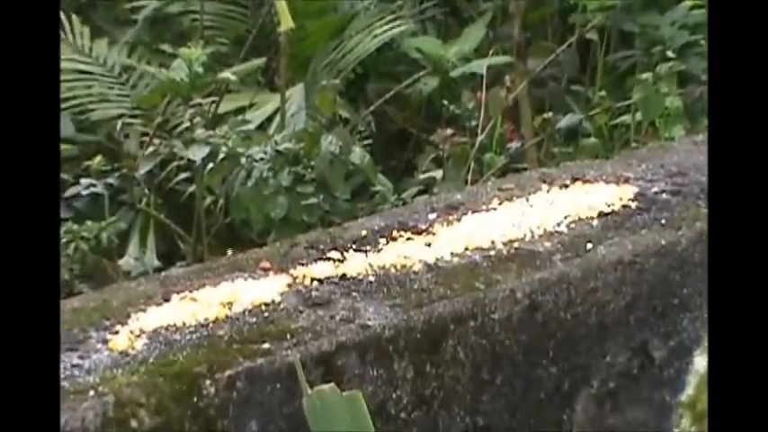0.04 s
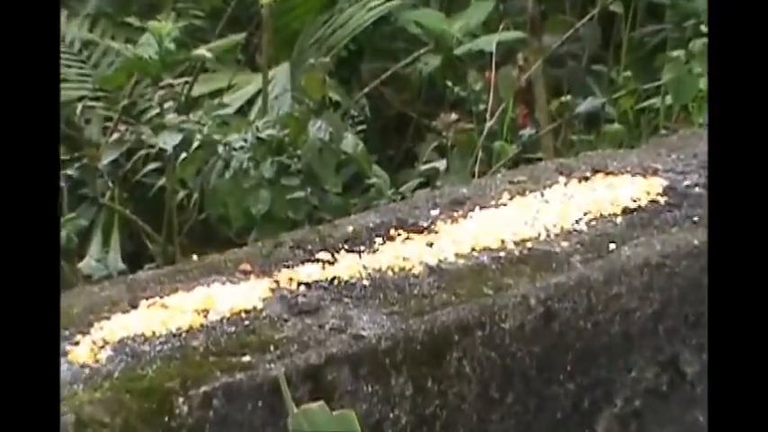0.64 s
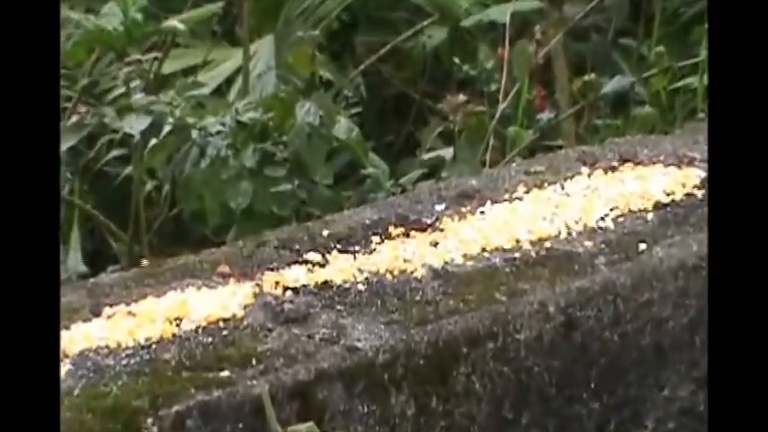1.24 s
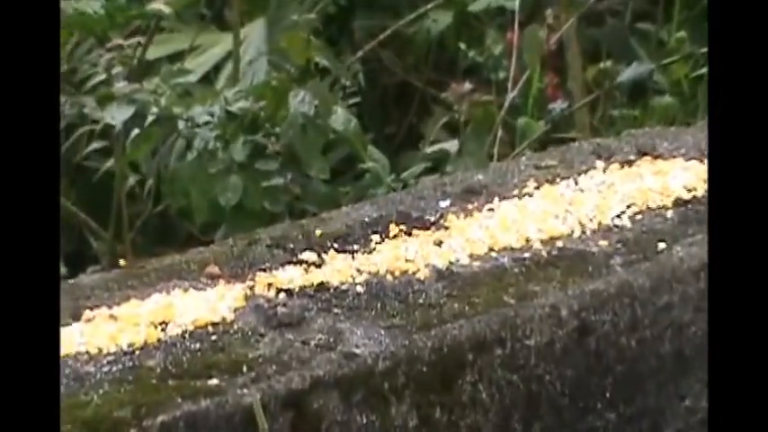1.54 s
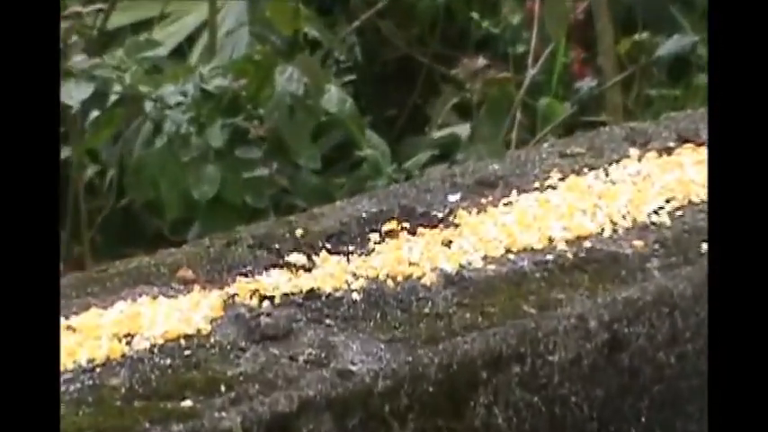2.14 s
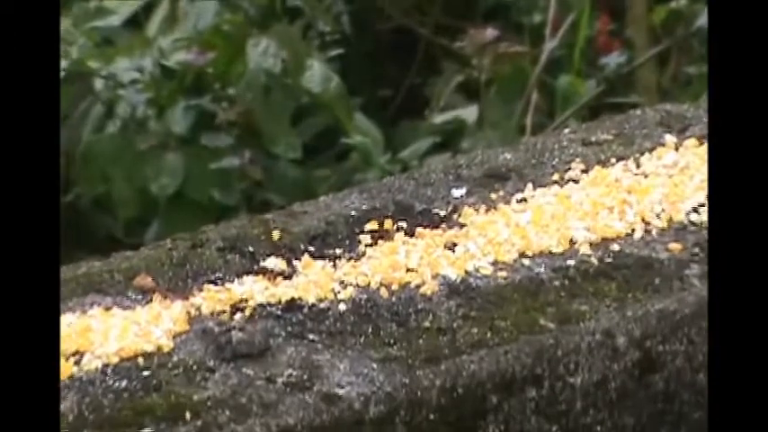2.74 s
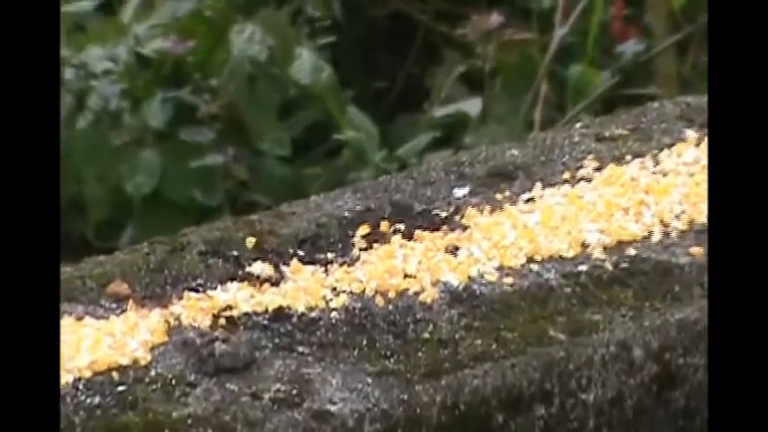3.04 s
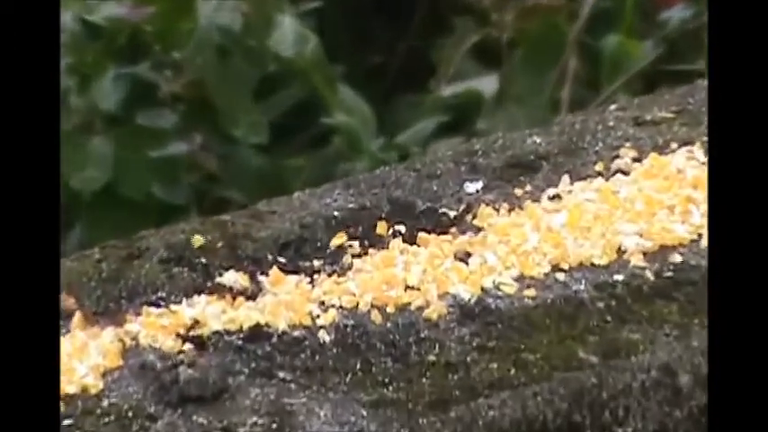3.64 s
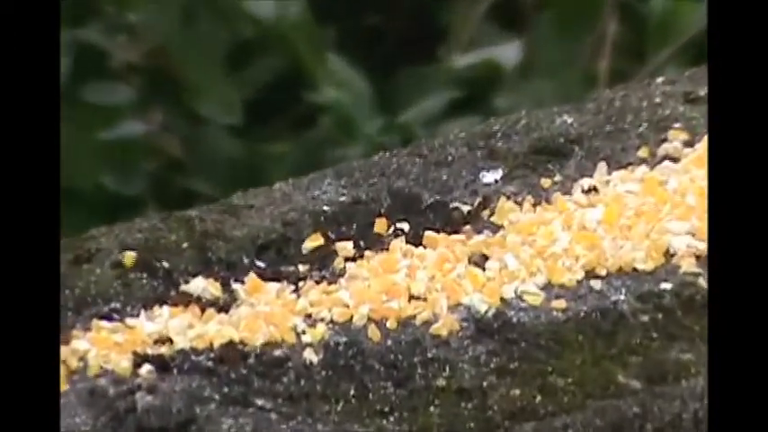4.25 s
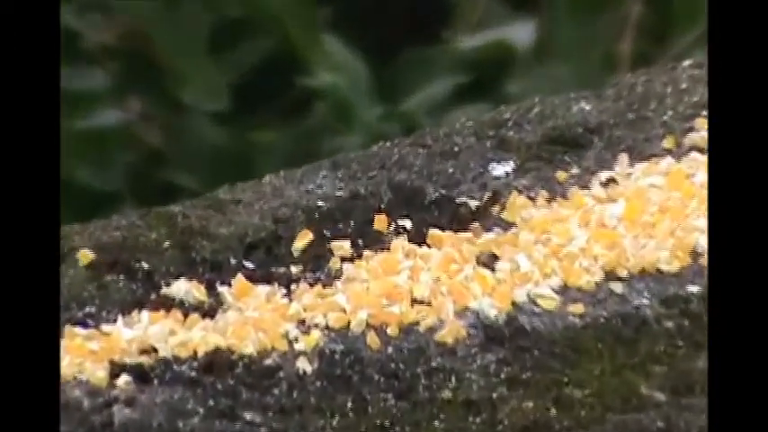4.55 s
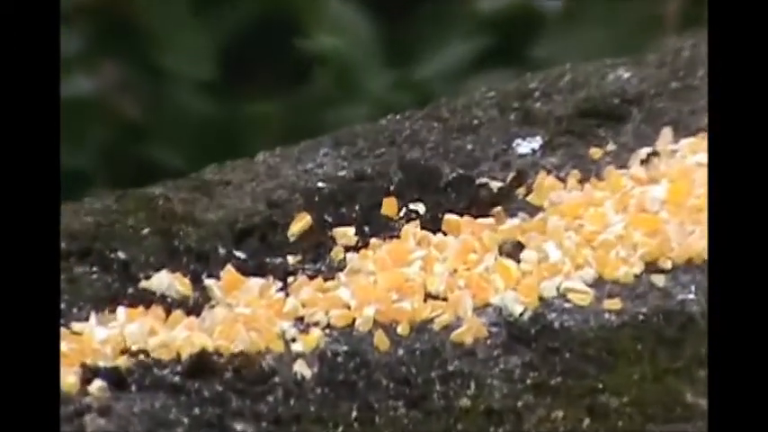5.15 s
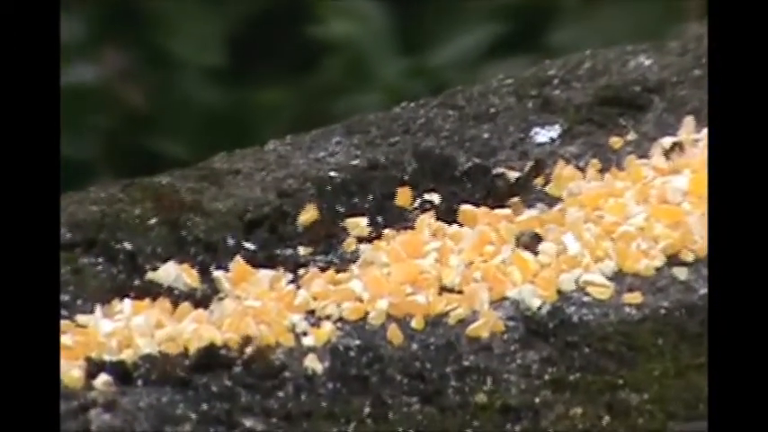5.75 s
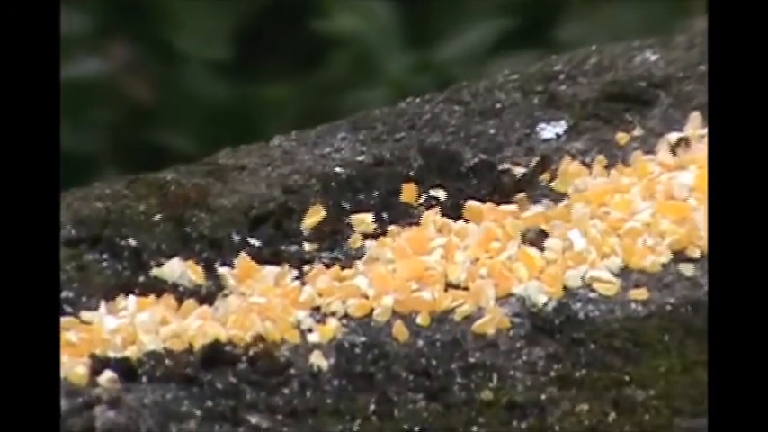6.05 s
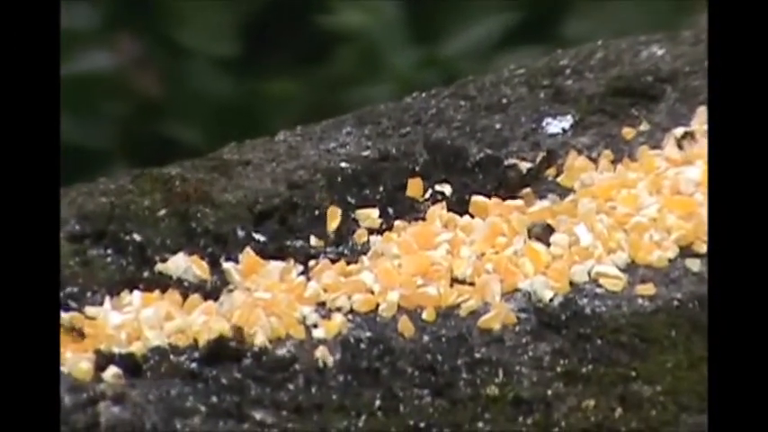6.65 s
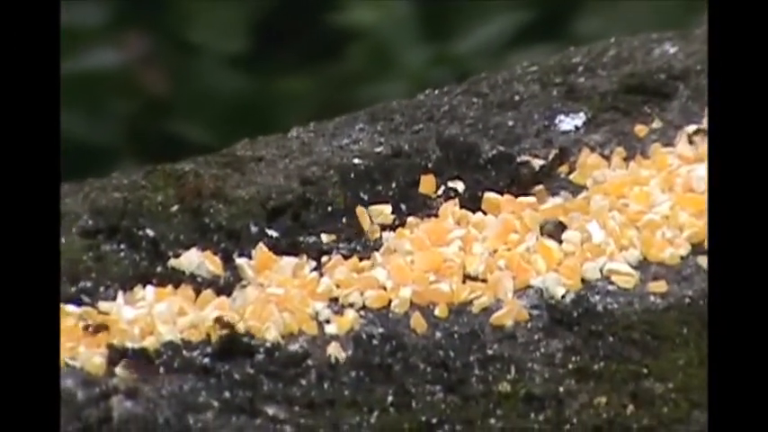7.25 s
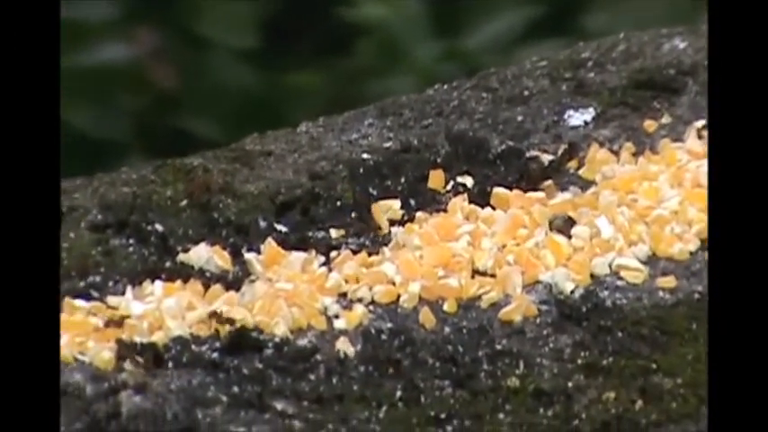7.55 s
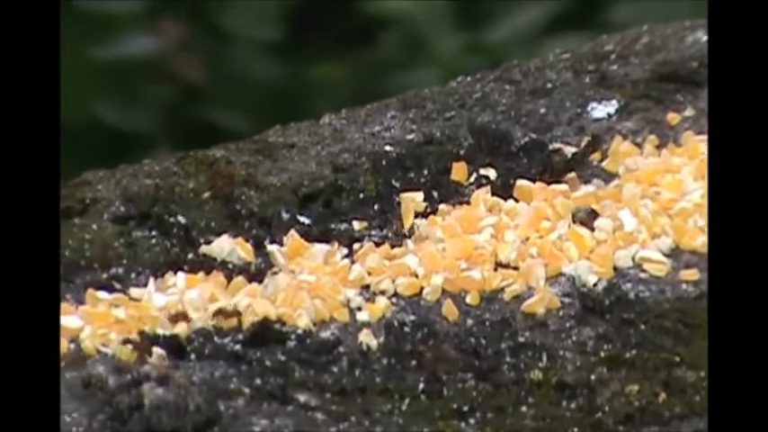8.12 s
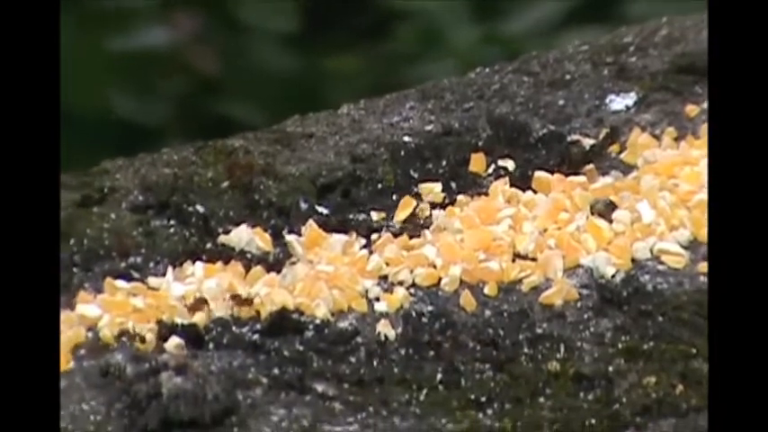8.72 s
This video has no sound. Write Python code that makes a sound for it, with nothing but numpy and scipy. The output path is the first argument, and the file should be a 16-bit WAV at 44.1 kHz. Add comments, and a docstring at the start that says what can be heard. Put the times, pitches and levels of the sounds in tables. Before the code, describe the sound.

Small birds call in dense garden foliage. A high falling whistle and a short harsh rasp come first, then chips, a soft trill and another whistle. The chatter thickens into buzzy notes and a louder sputtering trill, followed by two more close whistles. Leaves rustle and a twig snaps as the calls thin out. A distant low rumble and soft hiss run underneath, with one light knock on the microphone.

```python
"""Small birds in dense foliage by a garden wall: falling whistles, a harsh rasp, chips, sputtering trills.
Whistles are sagging near-sines, the rasp is a pulsed harmonic cry, chips are glides that a flutter
of the syrinx turns buzzy. The foliage scatters and echoes every call. A few rustles, dry snaps and
a knock on the hand-held camera sit over distant rumble, machinery drone and soft leaf hiss."""
import sys
import numpy as np
from scipy import signal
from scipy.fft import rfft, irfft
from scipy.io import wavfile
from scipy.ndimage import uniform_filter1d, map_coordinates

SR = 44100
rng = np.random.default_rng(int(sys.argv[2]) if len(sys.argv) > 2 else 0)


def store_pcm(level_fs):
    """Save levels as 16-bit WAV."""
    pcm = np.round(np.clip(level_fs, -1, 1) * 32767).astype(np.int16)
    wavfile.write(sys.argv[1], SR, np.atleast_2d(pcm).T)


N = 387198
TIME_S = np.arange(N) / SR
BINS_HZ = np.fft.rfftfreq(N, 1 / SR)
LEAD_S = 0.5  # room for the whistle that starts before time zero


def gain_of(db):
    """Decibels to amplitude."""
    return 10 ** (np.asarray(db) / 20)


def unit_rms(x):
    """Scales to an rms of one."""
    return x / np.sqrt(np.mean(x ** 2) + 1e-20)


def per_bin(points):
    """Interpolates (frequency, value) points onto the FFT bins, in log frequency."""
    hz, value = np.transpose(points)
    return np.interp(np.log(BINS_HZ + 1), np.log(hz + 1), value)


def coloured(x, colour):
    """Filters by (frequency [Hz], gain [dB]) points; unit rms."""
    return unit_rms(irfft(rfft(x) * gain_of(per_bin(colour)), N))


def add(mix, start_s, sound):
    """Mixes a sound in, cropped to fit."""
    start = round(start_s * SR)
    sound = sound[max(-start, 0):]
    part = mix[max(start, 0):][:len(sound)]
    part += sound[:len(part)]


def wander(samples, rate_hz):
    """Smooth random curve, rms near one."""
    knots = rng.standard_normal(4096)
    return map_coordinates(knots, [np.arange(samples) * rate_hz / SR], order=3, mode="wrap")


def phase_of(hz):
    """Running phase of a pitch curve."""
    return 2 * np.pi * np.cumsum(hz) / SR


def stereo_noise(coherence):
    """Two white noises of the given coherence."""
    left, other = rfft(rng.standard_normal((2, N)))
    return irfft(np.array([left, coherence * left + np.sqrt(1 - coherence ** 2) * other]), N)


# Falling whistles: (time [s], level [dB], start pitch [Hz], length [s], fade [dB/s],
# octave before the beak's low-pass [dB], depth in the leaves [0-1])
WHISTLE_CALLS = [(-.15, -13, 7310, 0.19, 172, -26, 0.84), (0.257, -43.5, 7200, 0.18, 5, -35, 1),
                 (2.999, -20, 7284, 0.22, 124, -23, 0.28), (6.007, -24, 7490, 0.153, 198, -37, 0.02),
                 (6.372, -14, 7210, .2, 161.5, -30, 0.28)]


def whistles(rest_hz=3080, sag_s=0.079, rise_s=0.035, beak_hz=4400):
    """Near-sines that swell and fade as the pitch sags to a resting note; returns near and deep mixes."""
    near, deep = np.zeros((2, N + round(LEAD_S * SR)))
    for start_s, db, top_hz, length_s, fade_db_per_s, octave_db, depth in WHISTLE_CALLS:
        t = np.arange(0, length_s, 1 / SR)
        hz = rest_hz + (top_hz - rest_hz) * np.exp(-t / sag_s)
        phase = phase_of(hz * (1 + .011 * wander(len(t), 350)))
        tremble = gain_of(2.2 * wander(len(t), 130))
        swell_db = 17 * np.minimum(t / rise_s - 1, 0) - fade_db_per_s * np.maximum(t - rise_s, 0)
        envelope = np.sqrt(2) * gain_of(db + swell_db) * tremble * signal.windows.tukey(len(t), .12)
        # the beak passes the octave only once the pitch is low enough
        octave_gain = gain_of(octave_db) / (1 + (hz / beak_hz) ** 12)
        call = envelope * (np.sin(phase) + octave_gain * np.sin(2 * phase))
        add(near, start_s + LEAD_S, (1 - depth) * call)
        add(deep, start_s + LEAD_S, depth * call)
    return near, deep


# Rasp contour: (time [s], level [dB], pitch [Hz])
RASP_CONTOUR = [(.966, -42, 1855), (.987, -29, 1932), (1.009, -24, 2002), (1.031, -28.5, 2000),
                (1.051, -23.5, 1915), (1.062, -32, 1580), (1.071, -39.5, 1370)]
# Rasp harmonics: (multiple, level [dB])
RASP_PARTIALS = [(1, -17), (2, 1.5), (3, -9.5), (4, -10.5), (5, -23.5), (6, -29)]


def rasp(pulse_hz=183, hoarse_db=-13):
    """A harmonic cry chopped by a second, slower vibration; returns start time and sound."""
    times_s, db, hz = np.transpose(RASP_CONTOUR)
    t = np.arange(times_s[0], times_s[-1], 1 / SR)
    beat = np.cos(phase_of(pulse_hz * (1 + 0.11 * wander(len(t), 92))))
    phase = phase_of(np.interp(t, times_s, hz) * (1 + 0.0049 * beat + 0.026 * wander(len(t), 1208)))
    cry = sum(gain_of(partial_db) * np.sin(k * phase) for k, partial_db in RASP_PARTIALS)
    turbulence_colour = [(1500, -25), (3500, -7), (5500, 1), (10000, -14), (13000, -26)]
    cry += gain_of(hoarse_db) * coloured(rng.standard_normal(N), turbulence_colour)[:len(t)]
    pulses = np.exp(np.linspace(2.2, .6, len(t)) * beat)  # distinct at first, then merging
    pulses /= np.sqrt(uniform_filter1d(pulses ** 2, size=480))
    return times_s[0], gain_of(np.interp(t, times_s, db)) * unit_rms(cry * pulses)


def chip(db, length_s, start_hz, end_hz, buzz, flutter_hz=330, jitter=0.0683):
    """A short glide; fast flutter of the syrinx shakes pitch and level into a buzz."""
    t = np.arange(0, length_s, 1 / SR)
    flutter = np.sin(phase_of(flutter_hz * (1 + 0.232 * wander(len(t), 160.4))))
    shake = 0.14 * flutter + jitter * wander(len(t), 1530)
    hz = np.geomspace(start_hz, end_hz, len(t)) * (1 + buzz * shake)
    tone = np.sin(phase_of(hz)) * (1 + 0.21 * buzz * np.roll(flutter, 20))
    return gain_of(db) * unit_rms(tone * signal.windows.tukey(len(t), .5))


# Falling chips: (time [s], level [dB], length [s], start pitch [Hz])
CHIP_NOTES = [(1.466, -47.5, 0.033, 6100), (1.541, -49.5, 0.024, 4300), (1.713, -49.5, .03, 5940),
              (1.779, -43, .06, 6140), (2.02, -41.5, 0.032, 4800), (2.046, -41.5, .055, 5930),
              (2.147, -46.5, 0.03, 6300), (3.974, -49.5, .038, 5780), (4.048, -45.5, 0.025, 3600),
              (4.211, -40.5, 0.081, 5540), (4.329, -40.5, 0.06, 5150), (4.44, -41.5, .035, 6200),
              (4.546, -34, .025, 5550), (4.605, -53, 0.017, 3650), (4.666, -35, .047, 6100),
              (4.724, -42.5, 0.026, 6870), (4.778, -46.5, .021, 4180), (4.834, -35.5, .028, 5640),
              (4.998, -33, 0.031, 5870), (5.045, -41.5, .029, 4780), (8.698, -49, .04, 6530),
              (8.725, -39.5, 0.055, 6160)]
# Harsh buzzes: (time [s], level [dB], length [s], buzz [0-1])
BUZZ_NOTES = [(2.335, -43, .026, .3), (2.81, -34, 0.034, 0.88), (2.899, -33.5, .017, 0.9),
              (4.864, -35, 0.048, 1), (5.077, -41, 0.069, 0.9), (5.212, -34, 0.0086, 0.1),
              (5.308, -34.5, .018, 0.8), (5.371, -32, 0.045, 0.64), (5.527, -34.5, .01, 0.4),
              (6.188, -25.5, 0.03, 0.51), (6.283, -24, .01, 0.8)]
# Thin high slurs: (time [s], level [dB], length [s], start pitch [Hz], end pitch [Hz], buzz [0-1])
SLUR_NOTES = [(0, -42, 0.071, 7200, 7280, 0.22), (0.111, -43, 0.2, 6540, 5900, 0.45),
              (0.269, -38, .13, 7370, 4880, 0.32), (0.819, -44, .1, 8600, 7000, .05),
              (.847, -49, .052, 7030, 6660, .24), (4.994, -45.5, 0.13, 8360, 6560, 0.48)]
# Faint high lisps: (time [s], level [dB])
LISP_NOTES = [(3.49, -58), (6.95, -54), (7.05, -52.5), (7.22, -54.5), (7.41, -56), (8.34, -59)]


def chatterers(low_note_hz=3470, gap_s=0.0151, buzz_hz=5330, lisp_hz=7470):
    """Falling chips, each followed by a soft low note, among buzzes, slurs and lisps."""
    out = np.zeros(N)
    for start_s, db, length_s, hz in CHIP_NOTES:
        add(out, start_s, chip(db, length_s, hz, .87 * hz, buzz=0.49))
        low_hz = low_note_hz * (1 + 0.0337 * rng.standard_normal())
        low_note = chip(db=-55, length_s=0.0218, start_hz=low_hz, end_hz=.92 * low_hz, buzz=0.28)
        add(out, start_s + length_s + gap_s, low_note)
    for start_s, db, length_s, buzz in BUZZ_NOTES:
        add(out, start_s, chip(db, length_s, buzz_hz, buzz_hz, buzz, jitter=0.081))
    for start_s, *note in SLUR_NOTES:
        add(out, start_s, chip(*note))
    for start_s, db in LISP_NOTES:
        add(out, start_s, chip(db, length_s=0.11, start_hz=lisp_hz, end_hz=lisp_hz, buzz=.5))
    return out


def trill(contour, colour, chips_per_s, top_hz, bottom_hz, colour_scale=0.26):
    """Tiny, uneven, buzzy downward chips, so fast that they run together."""
    times_s, db = np.transpose(contour)
    starts_s = np.arange(times_s[0], times_s[-1], 1 / chips_per_s)
    out = np.zeros(N)
    for start_s, (late, pitch, strength) in zip(starts_s, rng.standard_normal((512, 3))):
        detune = np.exp(.035 * pitch)
        note = chip(2.7 * strength, .014, top_hz * detune, bottom_hz * detune, buzz=.8)
        add(out, start_s + .003 * late, note)
    out = coloured(out, [(hz, colour_scale * gain_db) for hz, gain_db in colour])
    duty = (times_s[-1] - times_s[0]) * SR / N
    return out * np.sqrt(duty) * gain_of(np.interp(TIME_S, times_s, db))


# Trill contours, one list each: (time [s], level [dB])
TRILL_CONTOURS = [
    [(2.22, -45), (2.3, -43), (2.5, -42.5), (2.75, -40.5), (2.98, -53)],
    [(4.45, -50), (4.95, -46), (5.1, -34), (5.24, -44), (5.45, -37), (5.8, -35), (6.15, -33.5), (6.36, -65)],
]
# Trill spectra: (frequency [Hz], gain before colour_scale [dB])
SOFT_TRILL_SPECTRUM = [(1760, -45), (3000, -21), (3410, -11), (3740, 10.5), (4080, -17), (4430, 2),
                       (4820, -15), (5530, -4), (6350, -15), (7910, -13), (9000, -23), (11700, -56),
                       (19800, -120)]
LOUD_TRILL_SPECTRUM = [(1760, -54), (3000, -21), (3330, -1), (3630, -31), (3880, -4.5), (4230, -14),
                       (4470, -5.5), (5090, 1), (6290, -5.5), (7930, 14), (10000, -29), (13000, -59),
                       (22000, -120)]


def trills():
    """A softer, faster trill, then a louder one of narrower sweep."""
    soft = trill(TRILL_CONTOURS[0], SOFT_TRILL_SPECTRUM, chips_per_s=54, top_hz=6900, bottom_hz=3900)
    loud = trill(TRILL_CONTOURS[1], LOUD_TRILL_SPECTRUM, chips_per_s=46, top_hz=6430, bottom_hz=4183)
    return soft + loud


# Flock deeper in the leaves: (time [s], level [dB])
TWITTER_CONTOUR = [(0, -61), (1.2, -58.5), (1.8, -50), (2.3, -54.5), (3.2, -52), (3.75, -62.5), (4.45, -46),
                   (5.25, -41.5), (5.6, -47.5), (7.4, -57.5), (8.05, -66), (8.78, -51.5)]


def twitter(chips_per_s=55, low_hz=3400, high_hz=6700, spread_db=8):
    """Many faint falling chips of scattered pitch."""
    out = np.zeros(N)
    draws = rng.random((1024, 5))[:int(chips_per_s * N / SR)]
    for k, (late, pitch, slope, length, strength) in enumerate(draws):
        hz = low_hz * (high_hz / low_hz) ** pitch
        length_s = 0.0099 + 0.0182 * length
        note = chip(spread_db * strength, length_s, hz * (1 + 0.2106 * slope), hz * .96, buzz=0.28)
        add(out, (k + late) / chips_per_s, note)
    times_s, db = np.transpose(TWITTER_CONTOUR)
    return unit_rms(out) * gain_of(np.interp(TIME_S, times_s, db))


# Distant notes: (time [s], level [dB], length [s], start pitch [Hz], end pitch [Hz])
FAR_BIRD_NOTES = [(.53, -56, .072, 2080, 2190), (.75, -59, 0.15, 2523, 2480),
                  (3.386, -53.5, 0.076, 1214, 1334), (4.075, -55, 0.043, 2580, 2760),
                  (4.438, -53.5, .18, 1386, 1697), (6.602, -55.5, 0.06, 1586, 1730),
                  (7.098, -49, 0.042, 3280, 3720), (7.213, -50, 0.045, 1975, 2130),
                  (8.157, -57, 0.16, 1570, 1636), (8.526, -48, 0.042, 4430, 4280)]


def far_birds():
    """Soft, nearly pure glides from birds farther off."""
    out = np.zeros(N)
    for start_s, *note in FAR_BIRD_NOTES:
        add(out, start_s, chip(*note, buzz=0.14))
    return out


# Leaf swishes: (peak time [s], level [dB], rise [s], fall [s])
RUSTLE_EVENTS = [(5.98, -40.5, .04, 0.034), (6.06, -40, 0.0081, 0.032), (6.855, -37, 0.074, 0.036),
                 (7.577, -32.5, 0.007, 0.041), (8.429, -41.5, 0.041, 0.052)]
# Rustle spectrum: (frequency [Hz], gain [dB])
RUSTLE_SPECTRUM = [(350, -40), (600, -24), (722, 5), (823, -11), (1270, -1), (2460, -2), (3510, -8),
                   (6430, -5), (9680, -10.5), (14000, -40)]


def rustles(grain_db=3, grain_hz=400):
    """Brief swishes of dry leaves, made of uneven grains."""
    envelope = sum(gain_of(db) * np.exp(-np.maximum((peak_s - TIME_S) / rise_s, (TIME_S - peak_s) / fall_s))
                   for peak_s, db, rise_s, fall_s in RUSTLE_EVENTS)
    grains = rng.standard_normal(N) * gain_of(grain_db * wander(N, grain_hz))
    return envelope * coloured(grains, RUSTLE_SPECTRUM)


# Dry cracks: (time [s], level [dB])
SNAP_EVENTS = [(2.908, -34.5), (6.052, -29), (6.29, -32), (7.5603, -19.5)]


def snaps(decay_s=.0017):
    """Cracks as of twigs: noise bursts that die within milliseconds."""
    envelope = sum(gain_of(db) * (TIME_S > start_s) * np.exp(-np.abs(TIME_S - start_s) / decay_s)
                   for start_s, db in SNAP_EVENTS)
    colour = [(400, -9), (1300, -5.5), (2300, 1.5), (6000, -8), (12000, -28)]
    return envelope * coloured(rng.standard_normal(N), colour)


# Camera shell modes: (frequency [Hz], level [dB], t60 [s])
SHELL_MODES = [(1140, -19.5, 0.029), (1216, -25, 0.025), (870, -25.5, 0.024), (2230, -24.5, 0.013),
               (3370, -25, 0.012)]


def camera(knock_s=5.335, rise_s=0.0019, whine_hz=12279, whine_db=-77):
    """The electronics whine faintly; one soft touch rings the shell."""
    out = gain_of(whine_db) * np.sqrt(2) * np.sin(2 * np.pi * whine_hz * TIME_S)
    t = np.arange(0, .06, 1 / SR)
    ring = sum(gain_of(db - 60 * t / t60_s) * np.sin(2 * np.pi * hz * t) for hz, db, t60_s in SHELL_MODES)
    add(out, knock_s, (1 - np.exp(-t / rise_s)) * ring)
    return out


# Echoes off ground, wall and bank: (delay [s], gain)
NEAR_ECHOES = [(.0013, 0.016), (.0027, 0.28), (.0052, -0.44), (.0093, 0.41), (.016, .16), (.084, 0.16)]


def foliage(x, wet_db, t60_s=0.78, coherence=0.93, build_s=0.0032):
    """A few near reflections, then dense scatter off leaves and trunks; mono to stereo."""
    t = np.arange(SR) / SR
    scatter = stereo_noise(coherence)[:, :SR] * gain_of(-60 * t / t60_s) * (1 - np.exp(-t / build_s))
    response = gain_of(wet_db) * scatter / np.linalg.norm(scatter[0])
    response[:, 0] += 1  # direct path
    for delay_s, gain in NEAR_ECHOES:
        response[:, round(delay_s * SR)] += gain
    response /= np.linalg.norm(response[0])
    return signal.fftconvolve(x[None], response, axes=1)[:, :len(x)]


# Machinery tones: (frequency [Hz], width [Hz], level [dB])
MACHINERY_TONES = [(53.6, 5.2, -48.5), (112.1, 8.7, -48.5), (160.7, 12.5, -56.5), (210, 32, -70),
                   (281.3, 23, -58), (333.3, 9.2, -58)]


def machinery():
    """Distant drone: blurred low tones, each a narrow band of noise."""
    out = np.zeros(N)
    for hz, width_hz, db in MACHINERY_TONES:
        band = 1 / (1 + (2 * (BINS_HZ - hz) / width_hz) ** 2)
        out += gain_of(db) * unit_rms(irfft(rfft(rng.standard_normal(N)) * band, N))
    return out


def swell(contour, scale, column=1):
    """Gain curve from a contour's dB about its lower quartile, times scale."""
    times_s, db = np.transpose(contour)[[0, column]]
    return gain_of(scale * np.interp(TIME_S, times_s, db - np.quantile(db, .25)))


# Outdoor noise spectrum: (frequency [Hz], relative density [dB])
AIR_SPECTRUM = [(12, -31), (20, -4.5), (43, 0), (79, -7.5), (116, -5), (310, -10.5), (337, -10.5),
                (434, -14.5), (590, -14), (2080, -26), (3160, -27.5), (4300, -30.5), (6720, -30.5),
                (12400, -38.5), (16000, -40)]
# Its left-right likeness: (frequency [Hz], coherence [0-1])
AIR_COHERENCE = [(60, 0.97), (125, 0.95), (250, 0.74), (600, 0.8), (2400, 0.44), (6000, 0.32), (15000, 1)]
# Machinery contour, before swell's scaling: (time [s], bass level [dB], hum level [dB])
MACHINERY_CONTOUR = [(0.0, -34.5, -36), (0.6, -45, -45), (1.399, -37.5, -43), (2.3, -38.5, -41),
                     (4.3, -44, -43), (5.2, -45, -37.5), (6.6, -40, -41), (7.4, -42.5, -40),
                     (8.78, -48.5, -42.5)]
# Rumble and hiss contours, before swell's scaling: (time [s], level [dB])
RUMBLE_CONTOUR = [(0, -43.5), (1.4, -47), (3.9, -49.5), (6.6, -46.5), (8.78, -49)]
HISS_CONTOUR = [(0, -66.5), (1.7, -67.5), (4.9, -67), (5.4, -64.5), (6.15, -64), (8.78, -67.5)]


def background(air_db=-43, bass_split_hz=89.5, hiss_split_hz=1800):
    """Deep bass, machinery hum, far rumble and leaf hiss, each slowly swelling and receding."""
    air = gain_of(air_db) * rfft(coloured(stereo_noise(per_bin(AIR_COHERENCE)), AIR_SPECTRUM))
    drone = rfft(machinery())
    low_band = 1 / (1 + (BINS_HZ / hiss_split_hz) ** 4)
    bass_band = 1 / (1 + (BINS_HZ / bass_split_hz) ** 10)
    bass = irfft((air + drone) * bass_band, N) * swell(MACHINERY_CONTOUR, scale=.9)
    hum = irfft(drone * (1 - bass_band), N) * swell(MACHINERY_CONTOUR, scale=0.81, column=2)
    rumble = irfft(air * low_band * (1 - bass_band), N) * swell(RUMBLE_CONTOUR, scale=0.99)
    hiss = irfft(air * (1 - low_band), N) * swell(HISS_CONTOUR, scale=1.7)
    return gain_of(-2) * bass + gain_of(-1.5) * hum + rumble + hiss


def scene():
    """Whistlers near by, chatterers deeper in the leaves, the garden around them."""
    near, deep = whistles()
    rasp_s, cry = rasp()
    add(near, rasp_s + LEAD_S, cry)
    far = far_birds()
    calls = gain_of(2) * foliage(near, wet_db=-2, t60_s=0.58) + foliage(deep, wet_db=-1, t60_s=0.64)
    birds = calls[:, round(LEAD_S * SR):]
    birds += gain_of(1.5) * foliage(chatterers(), wet_db=-1, t60_s=0.57)
    birds += foliage(trills(), wet_db=3.5)
    birds += foliage(twitter(), wet_db=2)
    birds *= gain_of([[-.4], [.4]])  # slightly right
    distant = foliage(far, wet_db=2.5, coherence=1.0)
    leaves = foliage(rustles() + snaps(), wet_db=-5, t60_s=0.48, coherence=0.59)
    return birds + distant + leaves + camera() + background()


# Microphone port phase: (frequency [Hz], left lead [rad])
PORT_LEAD = [(20, 0), (110, 0.38), (250, 0.57), (600, 1.75), (1300, 1.49), (2300, 1.45), (3500, 0.8),
             (6200, 0.34), (12000, 0.92)]


def record(dry, cutoff_hz=15850):
    """Two microphone ports shift the phase between the channels; a low-pass limits the band."""
    phase_shift = np.exp(.5j * per_bin(PORT_LEAD) * np.array([[1], [-1]]))
    soft_ends = signal.windows.tukey(N, .0006)
    shifted = irfft(rfft(dry * soft_ends) * phase_shift, N)
    lowpass = signal.firwin(511, cutoff_hz, window=("kaiser", 9), fs=SR)
    return signal.oaconvolve(shifted, lowpass[None], "same")


dry = scene()
out = record(dry)
store_pcm(out)
```